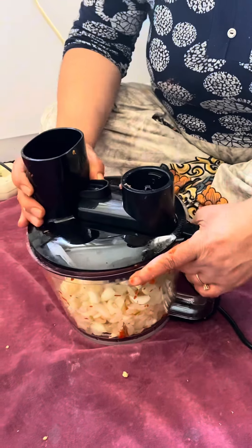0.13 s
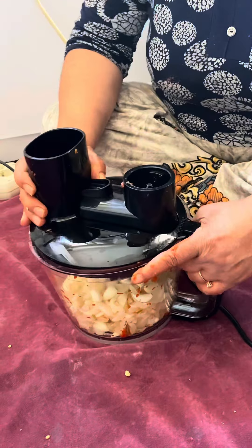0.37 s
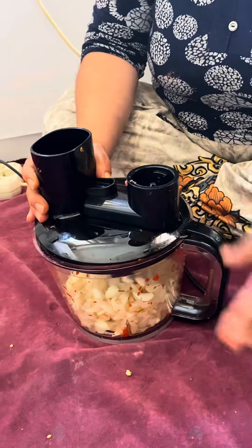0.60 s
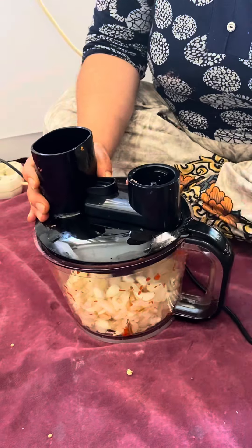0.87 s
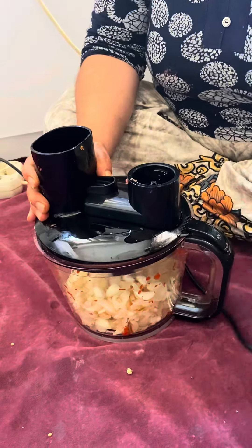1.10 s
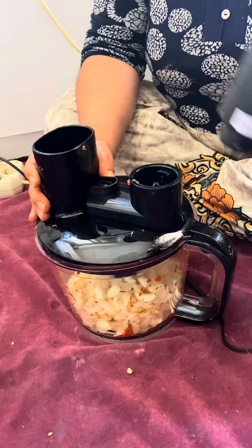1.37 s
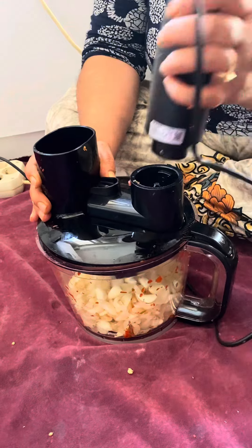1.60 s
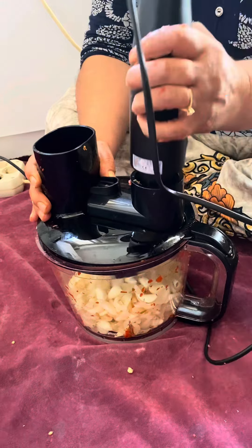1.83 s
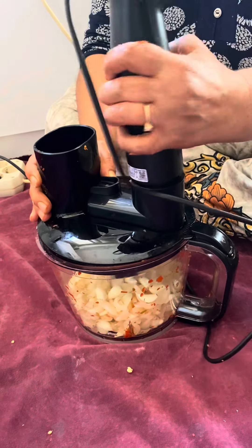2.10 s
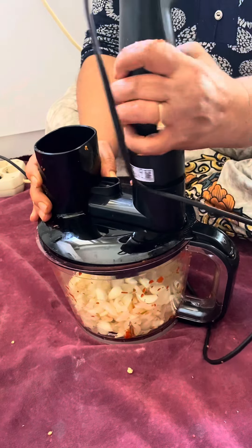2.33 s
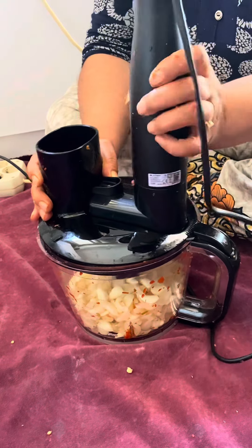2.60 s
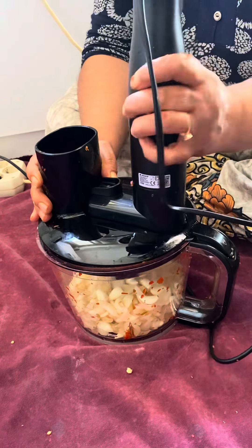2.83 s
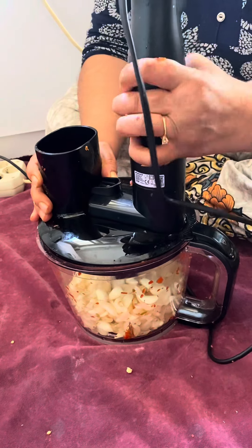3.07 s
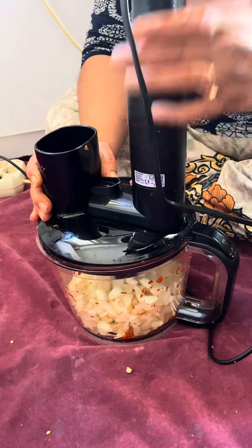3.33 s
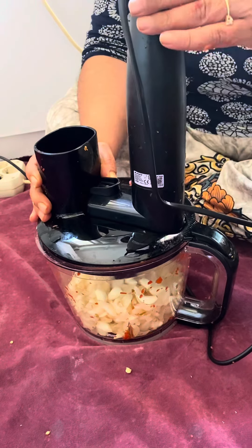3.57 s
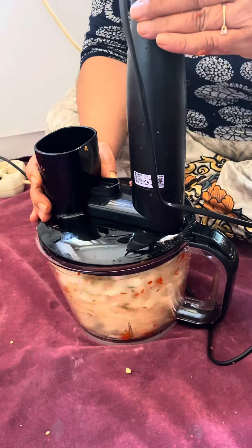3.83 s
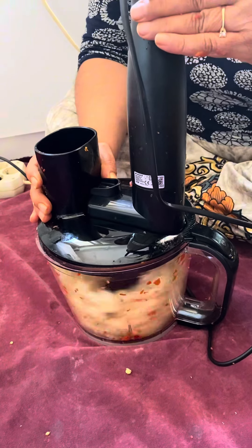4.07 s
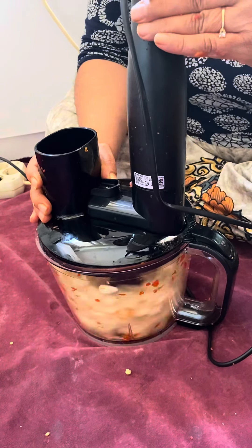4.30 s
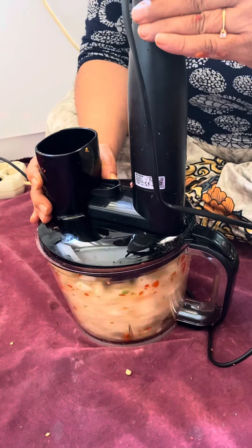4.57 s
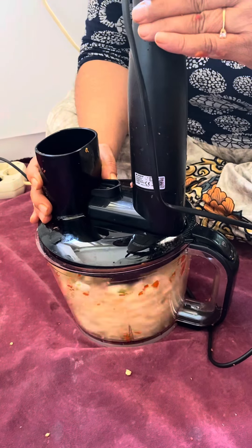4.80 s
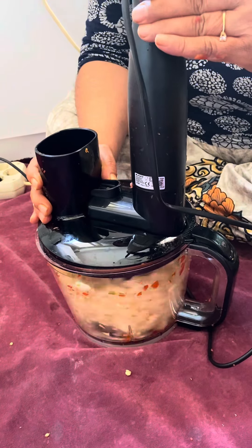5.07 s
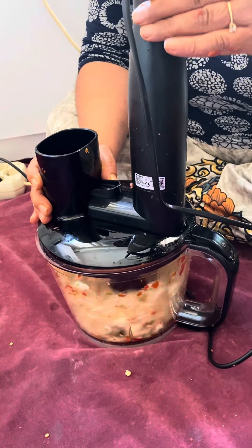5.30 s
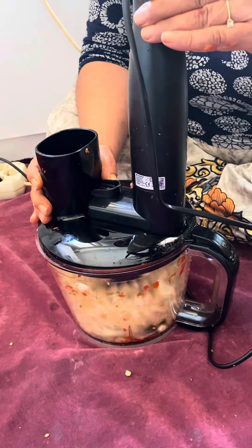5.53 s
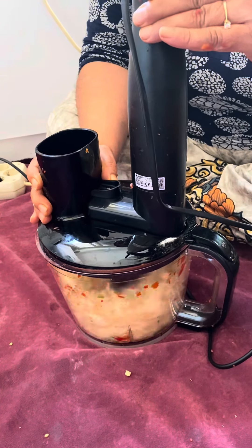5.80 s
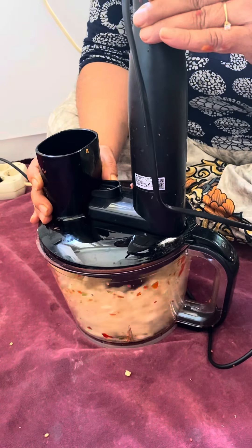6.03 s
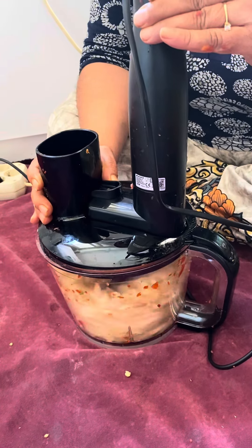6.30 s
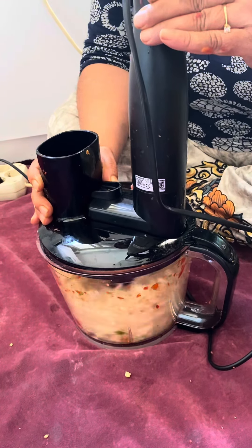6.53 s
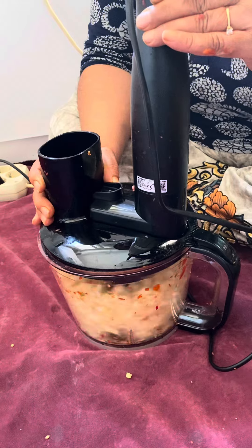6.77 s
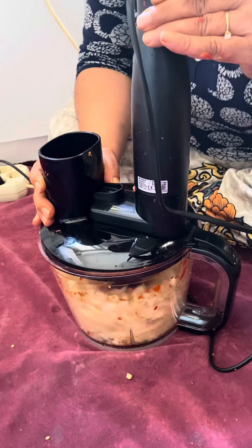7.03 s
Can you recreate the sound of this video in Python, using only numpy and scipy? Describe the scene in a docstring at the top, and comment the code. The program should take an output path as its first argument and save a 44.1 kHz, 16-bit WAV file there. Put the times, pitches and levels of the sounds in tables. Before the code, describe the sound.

Close plastic clicks and hollow bowl knocks come first, with sleeves brushing lightly and a quiet low room hum. After a pause, several firmer knocks fit the motor handle onto the lid. Then two bursts of electric whine and airy, rough rush, the first starting with loud slaps of coarse food, the second smoother after a short gap. Near stereo phone microphone, short kitchen echoes.

```python
"""Plastic chopper parts click and knock together near a phone, with cloth rustling and a soft hum behind. Then
the chopper's motor drives the blades in two bursts: gears whine over rushing noise, and food slaps the bowl.
Knocks are short noise cracks with ringing bowl tones; the motor is shaped noise plus wavering tones. Near
sounds reach two microphones, and a small kitchen answers with short echoes."""
import sys
import numpy as np
from scipy import signal
from scipy.fft import rfft, irfft, next_fast_len
from scipy.io import wavfile
from scipy.ndimage import map_coordinates

SR = 44100
rng = np.random.default_rng(int(sys.argv[2]) if len(sys.argv) > 2 else 0)


def boost(x):
    """Linear amplitude factor 10**(x/20) for a level x in decibels (scalar or array-like)."""
    u = np.asarray(x, float) / 20
    return 10 ** u


def master_out(mix):
    """Clip the mix to full scale and print it as 16-bit PCM to the path in sys.argv[1]."""
    frames = np.transpose(np.atleast_2d(mix))
    ceiling = np.clip(frames, -1, 1)
    pcm = np.round(ceiling * 32767).astype(np.int16)
    wavfile.write(sys.argv[1], SR, pcm)


N = 315315  # length in samples


def unit(x):
    """Scales a sound to an average strength (rms) of 1."""
    return x / np.sqrt(np.mean(x ** 2) + 1e-20)


def along(points, hz):
    """Reads a curve of (f/Hz, value) points, with pitch on a log axis."""
    f, value = np.transpose(points)
    return np.interp(np.log(hz + 1), np.log(f + 1), value)


def wobble(rate):
    """A smooth random curve through `rate` random points a second."""
    knots = rng.standard_normal(int(N * rate / SR) + 4)
    return map_coordinates(knots, [np.arange(N) * rate / SR])


def filtered(x, response):
    """Changes the strength and timing of each frequency in x by a given response."""
    m = next_fast_len(N + 8192)
    hz = np.fft.rfftfreq(m, 1 / SR)
    return irfft(rfft(x, m) * response(hz), m)[..., :N]


def noise(spectrum, channels=1):
    """Random hiss coloured by a spectrum, with rms 1."""
    white = rng.standard_normal((channels, N))
    return unit(filtered(white, lambda hz: boost(along(spectrum, hz))))


# Colour of the kitchen's low hum: (f/Hz, level/dB)
HUM_SPECTRUM = [(20, -24), (40, -12.5), (64, 1.5), (82, -6), (108, -1), (140, -19), (190, -9), (240, -23),
                (300, -20.5), (380, -32), (900, -30.5), (1500, -89)]
# Colour of the faint hiss: (f/Hz, level/dB)
HISS_SPECTRUM = [(150, -3), (400, 4.5), (1200, -5.5), (2200, -10), (5000, -22.5), (9000, -49.5),
                 (16000, -20.5)]


def room_tone():
    """Low hum alike at both microphones, with faint hiss that differs between them."""
    hum = boost(-47.5 + 2.8 * wobble(7.4)) * noise(HUM_SPECTRUM)
    return hum + boost(-57) * noise(HISS_SPECTRUM, channels=2)


# Colour shared by table thuds and churning food: (f/Hz, level/dB)
DULL_SPECTRUM = [(40, -56.5), (100, -15), (190, -12), (240, 0.5), (400, -1.5), (450, -10), (700, -13.5),
                 (1000, -73)]


def dull_noise():
    """Noise strongest in the lower pitches, for soft thuds and churning food."""
    return noise(DULL_SPECTRUM)[0]


# Sleeves, fingers and cable brushing: (t/s, hold/s, level/dB)
BRUSHES = [(0, 0.044, -47), (0.417, .03, -62), (0.857, 0.044, -59), (.97, .05, -59), (1.05, .06, -63.5),
           (1.262, 0.11, -56.5), (2.08, 0.089, -59.5), (2.25, 0.18, -67), (2.493, 0.16, -56.5),
           (2.897, 0.17, -67), (3.605, 0.11, -65)]
# Colour of the cloth rustle: (f/Hz, level/dB)
RUSTLE_SPECTRUM = [(300, -28), (1000, -2), (2500, 5), (6000, 4.5), (10000, -6), (16000, -20)]


def hands():
    """Cloth rustle swells in brushes and resting hands thud in the table, until the first switch-on."""
    rise_db_per_s, fall_db_per_s, fidget_db = 400, 109.5, -74.5
    thud_floor_db = -64
    shudder_db, shudder_fall_db_per_s = -32.5, 120  # table shudder against a knock, and its fading
    t = np.arange(N) / SR

    def swell(s, hold_s, db):
        """A brush's level climbs, holds and falls in straight lines of dB."""
        rise = rise_db_per_s * np.maximum(s - t, 0)
        fall = fall_db_per_s * np.maximum(t - s - hold_s, 0)
        return db - rise - fall

    rustle_db = np.maximum(fidget_db, np.max([swell(*row) for row in BRUSHES], axis=0))
    rustle = boost(rustle_db + 2.4 * wobble(78)) * noise(RUSTLE_SPECTRUM)[0]
    shudders = [np.where(t > s, db + knock_db + shudder_db - shudder_fall_db_per_s * (t - s), -120)
                for s, db, knock_db, *_ in KNOCKS]
    thud_db = np.maximum(thud_floor_db + 2 * wobble(4.06), np.max(shudders, axis=0))
    thuds = boost(thud_db + 1.3 * wobble(25)) * dull_noise()
    first_switch_on = BURSTS[0][0]
    return (t < first_switch_on) * (rustle + thuds)


# How far the left microphone is ahead: (f/Hz, left lead/radians)
LEFT_LEAD = [(0, 0), (1210, -0.6), (2410, 0.5), (2760, -0.1), (3790, 1.5), (4910, -0.3), (6370, 2.5),
             (8180, 3.5), (9650, 6.2), (11500, 6.4), (12500, 9.4), (14400, 9.4), (15300, 12.5),
             (16600, 12.8)]
# Loudness tilt between the microphones: (f/Hz, left minus right level/dB)
LEFT_TILT = [(60, 0.0), (110, 0.0), (200, 0.5), (380, 1.5), (700, 6.0), (1290, 5.0), (2380, 1.5),
             (4400, -1.0), (8120, 0.0), (15000, 0.0)]


def microphones(x):
    """A near source reaches the two ports with a lead and a tilt that depend on pitch."""
    def left(hz):
        """Half the difference goes to the left port; the right gets the opposite half."""
        return boost(along(LEFT_TILT, hz) / 2) * np.exp(.5j * np.interp(hz, *np.transpose(LEFT_LEAD)))
    return filtered(x, lambda hz: np.array([left(hz), 1 / left(hz)]))


# How long the kitchen's echoes take to fade by 60 dB: (f/Hz, fade/s)
ROOM_FADE = [(150, 0.17), (700, 0.19), (2000, 0.33), (5000, 0.22), (12000, 0.075)]


def kitchen(x):
    """Echoes die at their own speed for each pitch; bass is shared, and the pattern changes each quarter second."""
    step, delay = SR // 4, 300  # samples: a new answer each quarter second, arriving about 7 ms late
    out = np.zeros((2, N + SR))
    for start in range(0, N, step):
        hz, t, z = signal.stft(rng.standard_normal((2, SR // 2)), SR, nperseg=256)
        z = z * boost(-60 * t / along(ROOM_FADE, hz)[:, None])
        apart = np.clip((hz / 900) ** 2, 0, 1)[:, None]  # the sides are separate from 900 Hz up
        tail = signal.istft(z[:1] * (1 - apart) + z * apart, SR, nperseg=256)[1]
        tail = tail / np.linalg.norm(tail[0])
        answer = signal.fftconvolve(x[None, start:start + step], tail, axes=1)
        first = start + delay
        out[:, first:first + answer.shape[1]] += answer
    return out[:, :N]


# Ringing tones of the bowl: (f/Hz, level/dB, time to fade by 60 dB/s)
BOWL_MODES = [(63, -9, 0.42), (115.6, -0.5, 0.19), (185, -4.5, 0.1), (239.7, 0, 0.091), (291, -4, 0.082),
              (377, 3.5, 0.035), (510, -2, 0.044), (718, -2, 0.036), (970, -3.5, 0.066)]


def blows(table, crack_s, bloom_s):
    """Each blow is a short crack, then bowl tones that swell a few ms later, low ones last."""
    out = np.zeros(N + SR)
    t = np.arange(SR // 3) / SR
    treble_band = signal.butter(2, [2500, 12000], 'band', fs=SR, output='sos')
    for s, db, knock_db, hz, treble_db, body_hz in table:
        grit = rng.standard_normal((2, len(t)))
        band = signal.iirpeak(hz, 1.3, SR)
        ringing = signal.lfilter(*band, signal.lfilter(*band, grit[0]))
        snap = signal.sosfilt(treble_band, grit[1])
        crack_shape = boost(-60 * t / crack_s) * (1 - np.exp(-t / 0.0008))
        crack = (2.29 * ringing + 1.82 * boost(treble_db) * snap) * crack_shape
        modes = 0
        for f, level, fade_s in BOWL_MODES:
            # modes far from the knock's centre ring less, higher and lower ones unequally
            distance_db = min(20, 8 * np.log2(f / body_hz) ** 2 * (1 + (f < body_hz)))
            mode_db = level - distance_db + rng.normal(0, 3.0)
            bloom = 1 - np.exp(-(t * np.sqrt(f / 300) / bloom_s) ** 2)
            modes = modes + boost(mode_db - 60 * t / fade_s) * np.sin(2 * np.pi * f * t) * bloom
        out[round(s * SR):][:len(t)] += boost(db) * (crack + 0.88 * boost(knock_db) * modes)
    return out[:N]


# Parts knocking into the bowl:
# (t/s, click level/dB, bowl knock against click level/dB, click centre f/Hz, knock centre f/Hz)
KNOCKS = [(0.007, -25, 5.5, 902, 358), (0.039, -2.5, 0, 1940, 364), (0.383, -56, 22.5, 880, 243),
          (1.773, -16, 1.5, 1150, 273), (1.822, -27, 9, 966, 275), (1.841, -20, 1, 1120, 272),
          (1.861, -21, 2.5, 1660, 253), (2.07, -30.5, 9, 2240, 130), (2.08, -24, 6.5, 1480, 368),
          (2.093, -35.5, 18, 966, 130), (2.221, -48, 17, 1010, 242), (2.511, -28.5, 12, 1890, 185),
          (2.548, -22, 3, 2160, 288), (2.556, -5, 2, 1840, 356), (2.573, -11, 3.5, 950, 242),
          (2.715, -41, 11.5, 947, 183), (2.801, -35.5, 2.5, 1080, 308), (2.959, -13.5, 0.5, 1260, 353)]


def part_knocks():
    """Plastic parts hit the bowl: a click with little treble, then the bowl's knock."""
    treble_db = -16  # against the click
    rows = [(s, db, knock_db, hz, treble_db, body_hz) for s, db, knock_db, hz, body_hz in KNOCKS]
    return blows(rows, crack_s=0.031, bloom_s=0.0041)


# Light ticks of catches, cable and switch:
# (t/s, click level/dB, click centre f/Hz, treble against click level/dB)
TICKS = [(0.031, -14.5, 1990, -18), (0.446, -36, 2320, -10), (0.86, -28, 1250, -15.5),
         (0.965, -31.5, 1120, -7.5), (1.04, -30, 3240, -4.5), (1.379, -24, 2140, -9),
         (1.637, -29.5, 1360, -33), (2.473, -23, 2200, -14.5), (2.863, -35.5, 925, -13),
         (3.609, -34, 1150, -30), (3.661, -11, 1860, -13.5), (5.442, -31, 3020, -9),
         (5.465, -20, 1612, -16)]


def light_ticks():
    """Small clicks that pass only a little of their blow on to the bowl."""
    knock_db, knock_hz = -12, 330
    rows = [(s, db, knock_db, hz, treble_db, knock_hz) for s, db, hz, treble_db in TICKS]
    return blows(rows, crack_s=0.031, bloom_s=0.0041)


# Switch held down, levels before the boost for large pieces:
# (on t/s, spin-up/s, off t/s, rush at switch-on level/dB, rush at full speed level/dB)
BURSTS = [(3.664, 0.17, 5.136, -31.5, -21.5), (5.452, 0.081, 7.3, -48, -22.5)]


def drive():
    """Levels of rush and churning climb after switch-on, hold, then fade as the blades coast."""
    coarse_db, coarse_until_s, coarse_fade_s = 3, 4.33, 0.057  # louder while the pieces are still large
    coast_db_per_s, settle_db_per_s = 92, 65  # fading after switch-off: rush, churning food
    churn_db, churn_spin_up = -4.5, 0.78  # level against the rush; share of the spin-up time
    lumps_db, lumps_per_s = 1, 18  # food bunching up against the blades
    t = np.arange(N) / SR
    boost_db = coarse_db * np.interp(t, [coarse_until_s, coarse_until_s + coarse_fade_s], [1, 0])

    def level(share, fall_db_per_s):
        """The louder of the bursts at each moment."""
        levels = []
        for on, spin_up, off, start_db, full_db in BURSTS:
            left_to_climb = np.clip(1 - (t - on) / (share * spin_up), 0, 1) ** 2
            lost_db = fall_db_per_s * np.maximum(t - off, 0)
            top_db = full_db + boost_db
            running_db = top_db + (start_db - top_db) * left_to_climb - lost_db
            levels.append(np.where(t > on, running_db, -120))
        return np.max(levels, axis=0)

    food_db = level(churn_spin_up, settle_db_per_s) + churn_db + lumps_db * wobble(lumps_per_s)
    return level(0.99, coast_db_per_s), food_db


# Gear mesh rate, overshooting and hunting as the blades bite: (t/s, f/Hz)
SPEED = [(3.66, 450), (3.75, 760), (3.9, 940), (4.1, 915), (4.2, 960), (4.4, 918), (4.56, 948), (4.88, 917),
         (5.12, 930), (5.44, 480), (5.56, 850), (5.65, 975), (5.82, 888), (5.96, 955), (6.11, 903),
         (6.22, 930), (7.15, 910)]


def mesh_rate():
    """How many gear teeth meet each second, at every sample."""
    s, hz = np.transpose(SPEED)
    return np.interp(np.arange(N) / SR, s, hz)


# Housing and bowl resonances: (f/Hz, width/Hz, lift level/dB)
HOUSING = [(242, 27, 1), (299.5, 11, 4), (408, 27, 6), (524.5, 43, 4), (605, 27, -2), (1646, 37, 7),
           (1940, 310, 7), (2704, 290, 8), (2986, 100, 5.5), (3724, 204, 8), (4603, 230, 7),
           (6044, 590, 10), (8680, 1280, 17.5)]


def through_housing(x):
    """Housing and bowl shape the sound around their own resonances."""
    def lift(hz):
        """Adds up the dB lift of all resonances."""
        return boost(sum(db / (1 + (2 * (hz - centre) / width) ** 2) for centre, width, db in HOUSING))
    return filtered(x, lift)


# Throbs of the rush, one a turn of a shaft: (multiple of mesh rate, depth 0-1)
THROBS = [(.022, 0.04), (.191, 0.05), (.232, 0.16)]
# Colour of the air and bearing rush: (f/Hz, level/dB)
RUSH_SPECTRUM = [(300, -53), (520, -2), (1100, 3), (1900, -1), (2350, -4), (2900, -6), (3400, -8),
                 (6000, -11), (8800, -23), (10000, -20.5), (14500, -19.5), (16800, -37.5)]


def motor_rush(rush_db, mesh_hz):
    """Air and bearing noise throbs with the shafts; below full power it is duller and lumpier."""
    slack_db = np.clip(rush_db + 26, -40, 0)
    throb = 1 + sum(depth * np.sin(2 * np.pi * k * np.cumsum(mesh_hz) / SR) for k, depth in THROBS)
    lumps = boost((1.52 - 0.073 * slack_db) * wobble(60))
    rush = unit(through_housing(noise(RUSH_SPECTRUM)[0] * throb * lumps))
    treble = filtered(rush, lambda hz: hz ** 2 / (hz ** 2 + 2500 ** 2))
    return rush + (boost(0.4 * slack_db) - 1) * treble


def tone(hz, width_hz):
    """An unsteady tone whose pitch and size waver."""
    pitch = hz + 0.2982 * width_hz * wobble(width_hz)
    return boost(2.3 * wobble(width_hz + 12)) * np.sin(2 * np.pi * np.cumsum(pitch) / SR)


# Gear and shaft tones, levels before the housing and drive:
# (multiple of mesh rate, level/dB, waver setting/Hz, extra just after a start level/dB)
WHINES = [(0.192, -16.5, 8, 0), (.88, -17.5, 14, 1), (1, -11, 10, 0), (1.325, -15, 12, -0.5),
          (1.75, -19, 14, 0), (2.02, -18.5, 14, 7.5), (2.97, -22, 30, 3), (3.98, -27, 60, -1)]


def gear_whine(rush_db, mesh_hz):
    """Tones follow the gears and sing only under full drive; some are louder or softer after a start."""
    fresh_s = 0.49  # how long the change after a start lasts
    t = np.arange(N) / SR
    fresh = sum((t > on) * np.exp(-((t - on) / fresh_s) ** 2) for on, *_ in BURSTS)
    engaged = boost(2.2 * np.minimum(rush_db + 23, 0))
    tones = sum(boost(db + fresh_db * fresh) * tone(k * mesh_hz, width_hz)
                for k, db, width_hz, fresh_db in WHINES)
    return engaged * through_housing(tones)


def motor():
    """Rush, gear tones and churning food, all coloured by the housing."""
    rush_db, churn_db = drive()
    mesh_hz = mesh_rate()
    rush = motor_rush(rush_db, mesh_hz)
    whine = gear_whine(rush_db, mesh_hz)
    churn = unit(through_housing(dull_noise() * boost(0.92 * wobble(30))))
    return boost(rush_db) * (0.94 * rush + 1.175 * whine) + boost(churn_db) * churn


# Food pieces slapping the bowl: # (t/s, click level/dB, bowl knock against click level/dB, click centre f/Hz)
CHUNKS = [(3.681, -9.5, -4.5, 1560), (3.7034, -17, -1, 1370), (3.7288, -13, -2.5, 1556),
          (3.8222, 0, -8.5, 1560), (3.863, -9, -1, 1680), (3.9, -1, -20, 2126), (3.967, -7, -10, 1880),
          (4.069, -7.5, -3, 2630), (4.127, -4.5, -11, 2220), (4.2182, -9, -12, 1990),
          (5.5171, -13, -13, 1240), (5.658, -6, -7, 2020)]


def food_slaps():
    """Chopped pieces slap the bowl: brief cracks with the bowl ringing around 350 Hz."""
    treble_db, knock_hz = -22, 350
    return blows([(*row, treble_db, knock_hz) for row in CHUNKS], crack_s=.024, bloom_s=.004)


def scene():
    """Hands, knocks and motor, near and in the room, over the room tone."""
    cloth = hands()
    hits = part_knocks() + light_ticks()
    machine = motor() + food_slaps()
    near = microphones(hits + machine + cloth)
    echoes = kitchen(boost(-11.0) * hits + boost(-10) * machine + boost(-11.5) * cloth)
    return near + echoes + room_tone()


def top_cut(x):
    """Nothing passes above the cut-off."""
    return signal.sosfilt(signal.butter(12, 17020, fs=SR, output="sos"), x)


def record(dry):
    """The phone's band limit steeply removes the sound above about 15.7 kHz."""
    mix = filtered(dry, lambda hz: 1 / (1 + (hz / 15700) ** 40))
    return top_cut(mix)


dry = scene()
out = record(dry)
master_out(out)
```